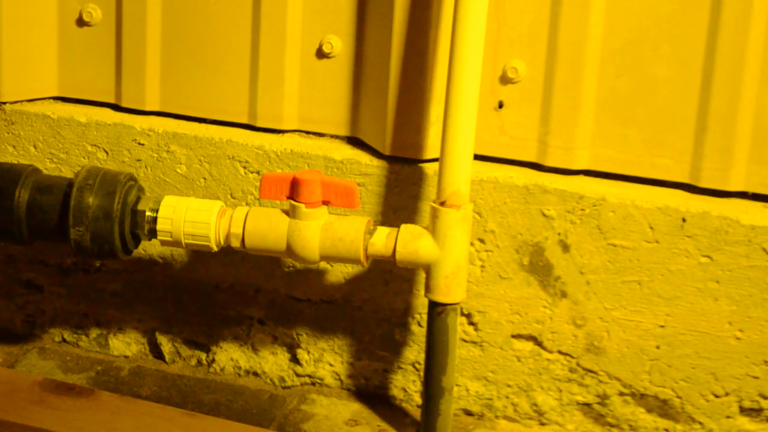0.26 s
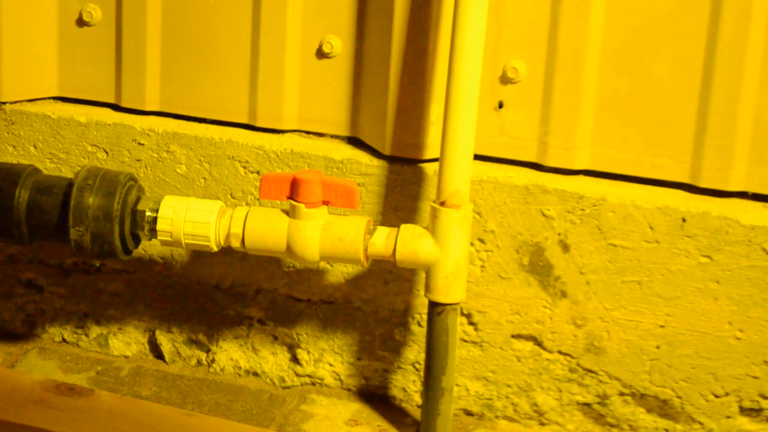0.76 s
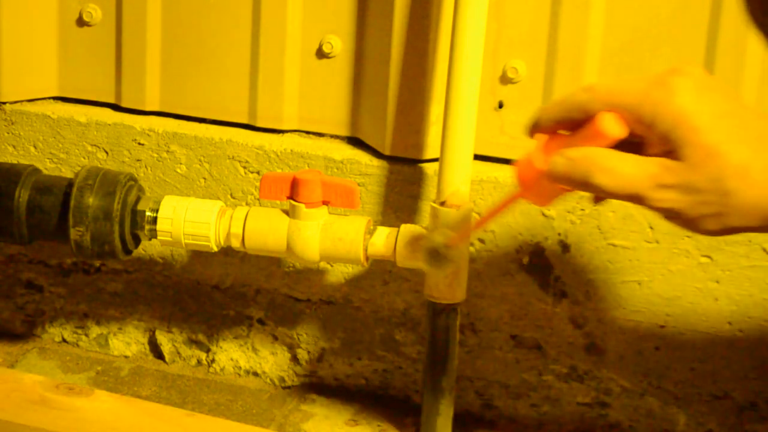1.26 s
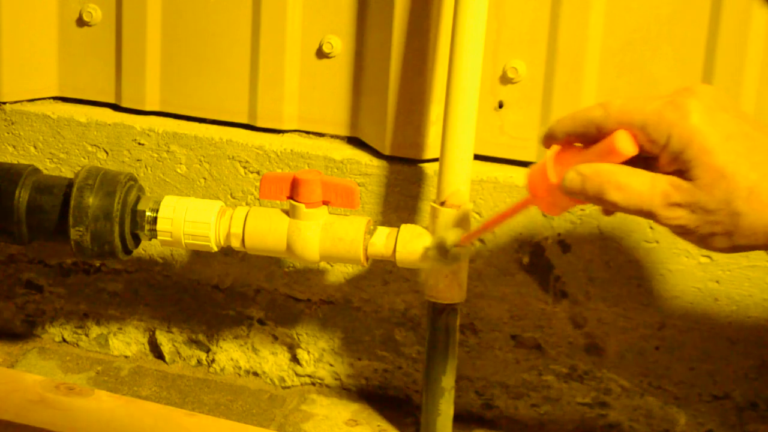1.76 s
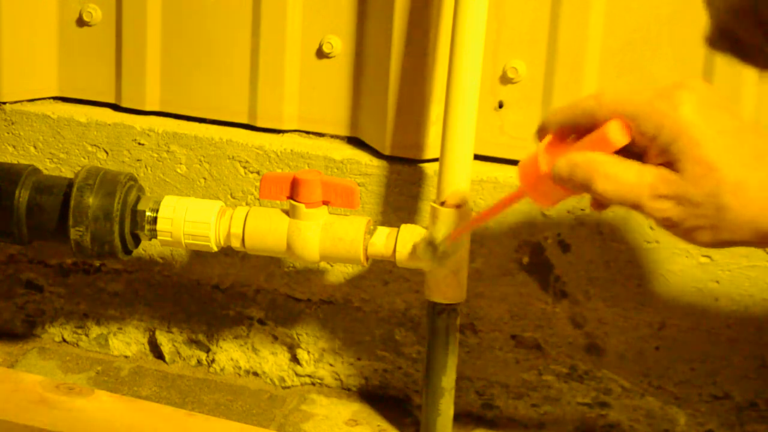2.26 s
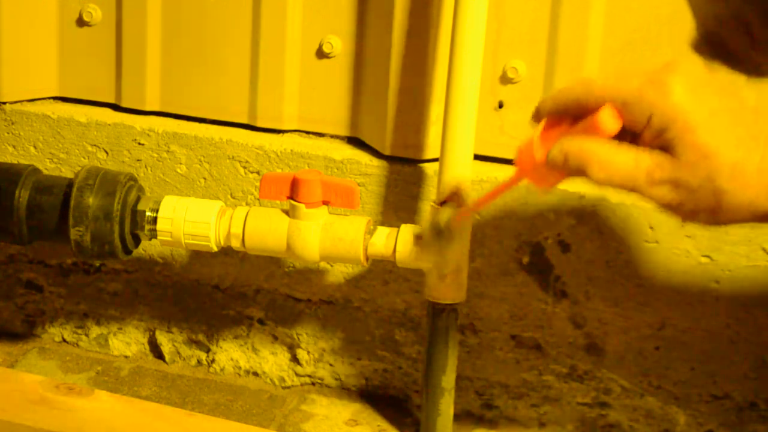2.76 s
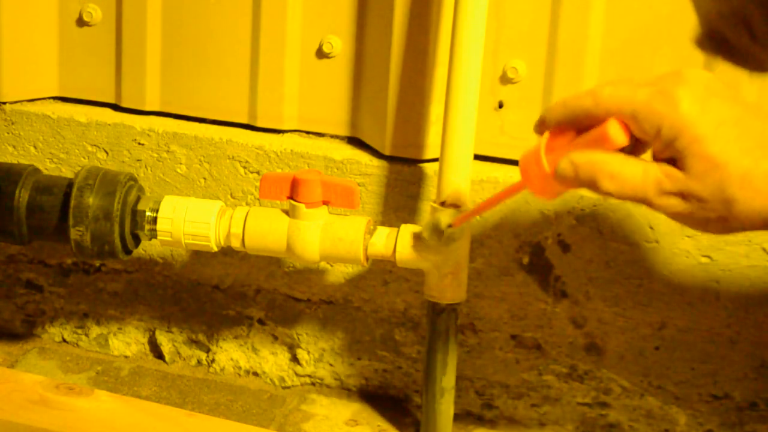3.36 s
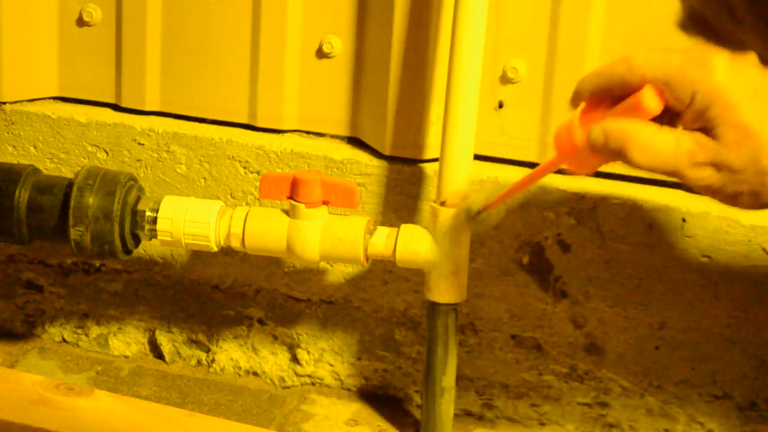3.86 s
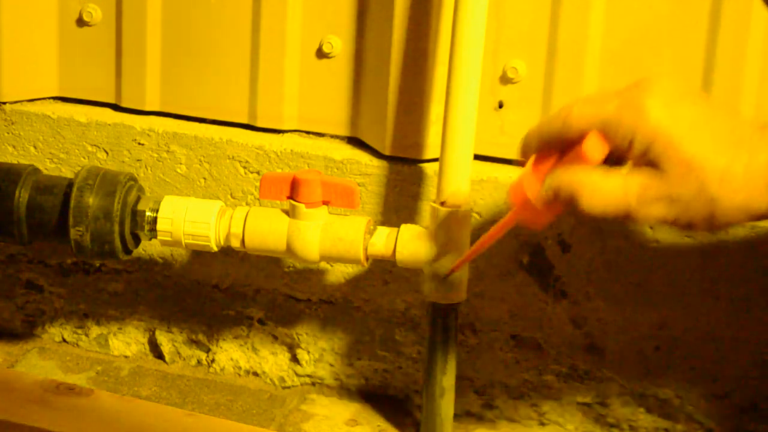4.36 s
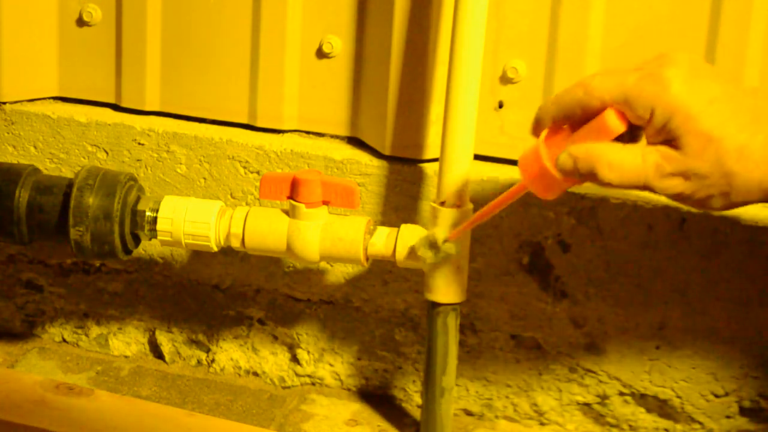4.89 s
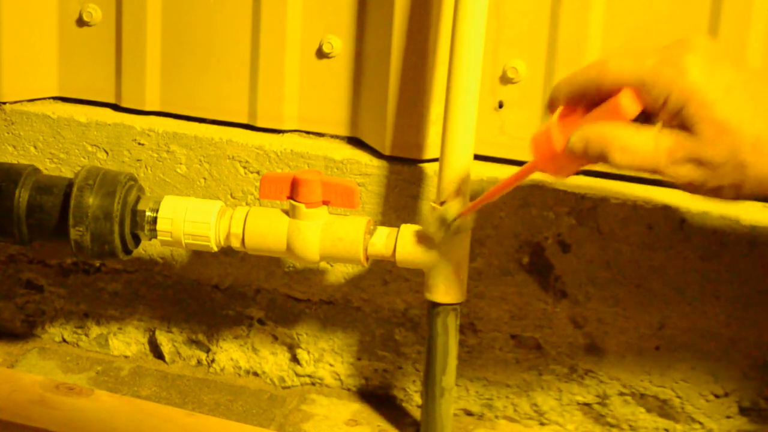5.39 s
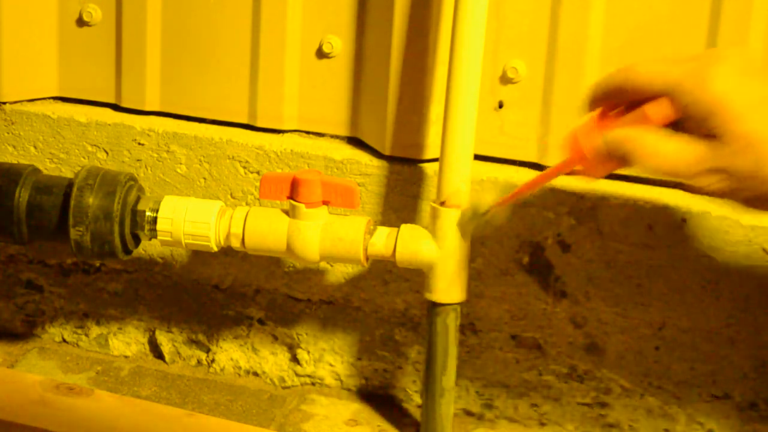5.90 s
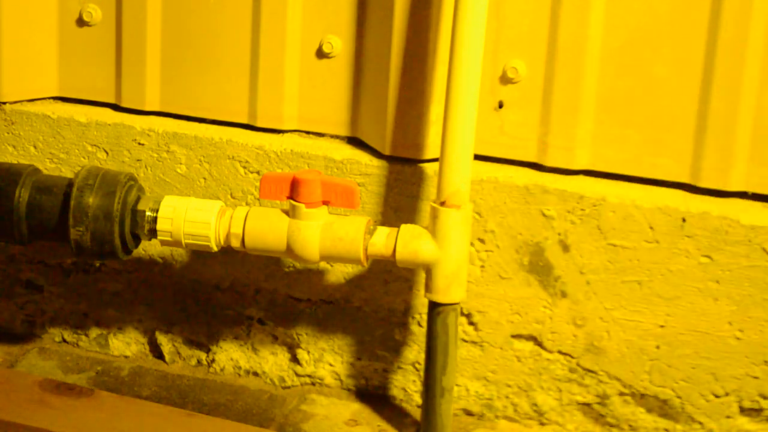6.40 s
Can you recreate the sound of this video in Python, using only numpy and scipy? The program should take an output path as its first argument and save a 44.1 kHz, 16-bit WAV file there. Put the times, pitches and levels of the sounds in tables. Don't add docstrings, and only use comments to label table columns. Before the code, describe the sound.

A suction motor drones steadily at mid pitch with rushing air, loud for half a second, then abruptly much quieter, with faint soft bumps.

```python
import sys
import numpy as np
from scipy import signal
from scipy.fft import rfft, irfft, next_fast_len
from scipy.io import wavfile
from scipy.ndimage import uniform_filter1d, map_coordinates

SR = 44100
rng = np.random.default_rng(int(sys.argv[2]) if len(sys.argv) > 2 else 0)


def natural_amplitude(level_db):
    exponent = np.asarray(level_db, float) / 20
    return 10 ** exponent


def master_out(mix):
    frames = np.transpose(np.atleast_2d(mix))
    ceiling = np.clip(frames, -1, 1)
    pcm = np.round(ceiling * 32767).astype(np.int16)
    wavfile.write(sys.argv[1], SR, pcm)


N = 292824
TIME = np.arange(N) / SR


def unit(x):
    return x / np.sqrt(np.mean(x ** 2) + 1e-20)


def wobble(rate, where=TIME):
    knots = rng.standard_normal(int(where[-1] * rate) + 4)
    return map_coordinates(knots, [where * rate])


def along(points, hz):
    point_hz, point_db = np.transpose(points)
    return np.interp(np.log(hz + 1), np.log(point_hz + 1), point_db)


def bell(hz, width):
    return lambda f: 1 / (1 + (2 * (f - hz) / width) ** 2)


def band_noise(colour_db):
    m = next_fast_len(N + 8192)
    spectrum = rfft(rng.standard_normal(m))
    return irfft(spectrum * natural_amplitude(colour_db(np.fft.rfftfreq(m, 1 / SR))), m)[:N]


def tone(turns, db, unsteady_db):
    level = np.sqrt(2) * natural_amplitude(db + unsteady_db * wobble(6))
    phase_drift = 0.16 * unsteady_db * wobble(5)
    return level * np.sin(2 * np.pi * turns + phase_drift + rng.uniform(0, 2 * np.pi))


def blades():
    # time in seconds, blade-pass rate in Hz.
    wheel = [
        (0, 405.15),
        (1.2, 405.42),
        (2.2, 405.45),
        (2.7, 405.65),
        (3.6, 404.95),
        (5.1, 405.97),
        (5.9, 405.4),
        (6.64, 405.55),
    ]
    # multiple of the blade pass, level in dB beside the blade tone, unsteadiness in dB.
    orders = [
        (2, -15, 1.2),
        (3, -32, 2),
        (4, -30, 2),
        (7, -34.5, 2),
    ]
    wheel_s, wheel_hz = np.transpose(wheel)
    turns = np.cumsum(np.interp(TIME, wheel_s, wheel_hz)) / SR
    overtones = sum(tone(k * turns, -43 + rel_db, shake) for k, rel_db, shake in orders)

    start_db, creep_db_per_s = -44, 0.26
    shift_s, shift_takes_s, shift_db, after_db_per_s = 4.4, 0.2, 1.7, -0.13
    shifted = np.clip((TIME - shift_s) / shift_takes_s, 0, 1)
    level_db = start_db + creep_db_per_s * np.minimum(TIME, shift_s)
    level_db += shifted * (shift_db + after_db_per_s * (TIME - shift_s))
    return tone(turns, level_db, 0.28) + overtones


def electric_hum():
    # frequency in Hz, level in dB, unsteadiness in dB.
    lines = [(120, -64.3, .5), (240, -77, 1), (451, -69, 2), (690.4, -71, 2), (1050.7, -65, 1.2),
             (1097, -72, 2), (1501.7, -72, 1.6), (4460, -90, 1.2), (4740, -96, 2), (8799, -104, 1.6),
             (8920, -104, 1.6), (9040, -109, 1.6), (13379, -115, 1.6), (15677.5, -106, .4)]
    return sum(tone(hz * TIME, db, shake) for hz, db, shake in lines)


def pipe_note():
    # frequency in Hz, width in Hz, level in dB.
    column = (295, 7, -61)
    hz, width, db = column
    resonance = bell(hz, width)
    note = signal.hilbert(unit(band_noise(lambda f: 20 * np.log10(resonance(f)))))
    evened = np.real(note / (np.abs(note) + 0.74) ** 0.5)
    return natural_amplitude(db) * unit(evened)


def air_rush():
    # frequency in Hz, density in dB per Hz.
    flow = [(20, -26), (60, -23.5), (110, -24.0), (200, 0.5), (400, -0.6), (700, -2.5), (1200, -10.0),
            (2000, -13), (3000, -21), (4500, -32), (6000, -39.5), (9000, -45.5), (13000, -51.5),
            (15600, -58.5)]
    # frequency in Hz, width in Hz, gain in dB.
    pipework = [(117, 50, 12.5), (174, 8, 0.8), (197, 38, -10.1), (265, 62, -15.3), (292, 22, 9.8),
                (346, 14, -6.0), (480, 26, -6.4), (532, 11, -3.5), (614, 15, 4.2), (673, 23, 4.9),
                (784, 93, -13.1), (797, 49, 14.6), (910, 82, 7.3), (926, 33, -9.8), (1104, 21, 4.7),
                (1136, 18, -4.7), (1181, 64, 7.1), (1319, 22, -3.9), (1356, 11, -4.0), (1406, 23, 5.8),
                (1689, 20, -10.9), (1703, 37, 8.0), (1836, 93, 6.2), (2042, 19, 5.8), (2094, 36, -7.4),
                (2280, 64, 9.4)]
    # frequency in Hz, width in Hz, gain in dB.
    shed = [(2321, 130, -12.5), (2378, 13, -5.1), (2400, 178, 8.1), (2460, 44, -7.2), (2606, 55, 7.7),
            (2607, 257, -7.7), (2812, 27, -5.4), (2924, 285, 4.5), (3189, 56, -4.6), (3429, 37, 6.7),
            (3739, 26, 6.2), (4187, 48, 5.9), (4258, 18, -5.9), (4544, 114, 5.8), (4722, 433, -3.0),
            (4739, 20, 6.8), (4836, 41, -11.5), (4839, 82, 10.4), (5002, 53, -5.7), (5181, 385, 8.4),
            (5235, 166, -10.1), (5811, 181, -5.6), (6090, 95, -5.0), (6732, 70, 7.3), (8804, 20, 8.6),
            (8873, 25, -3.3)]
    # frequency in Hz, width in Hz, gain in dB.
    panels = [(325, 20, 2), (345, 12, -3), (450, 14, 1.5), (565, 20, 4), (580, 14, -3), (670, 16, 1.5),
              (975, 20, 3), (1200, 10, -3), (1210, 14, 6), (1225, 12, -4), (1250, 14, -4), (1267, 20, 4),
              (1450, 20, 3), (1480, 14, -4), (1640, 12, -5), (1655, 14, 5), (1885, 14, -4), (2150, 25, 3),
              (3300, 20, -5), (3345, 20, 4), (3430, 40, -2), (3860, 50, -3), (3920, 40, 4), (4410, 30, -4),
              (9750, 70, 4), (10300, 90, 3), (12400, 120, 3), (14300, 200, 2), (14950, 500, 3),
              (15500, 400, -3)]

    def colour_db(f):
        resonances = sum(db * bell(hz, width)(f) for hz, width, db in pipework + shed + panels)
        ripple = 1.2 * wobble(1 / 22, f) * np.clip(f / 2000 - 0.5, 0, 1)
        return along(flow, f) + resonances + ripple

    _, _, z = signal.stft(band_noise(colour_db), SR, nperseg=1024)
    patches = uniform_filter1d(rng.standard_normal(z.shape), 5, axis=0)
    patches = uniform_filter1d(patches, 30, axis=1)
    rush = signal.istft(z * natural_amplitude(0.49 * unit(patches)), SR, nperseg=1024)[1][:N]
    return natural_amplitude(-48) * unit(rush)


def handling_rumble():
    # frequency in Hz, density in dB per Hz.
    low_end = [(12, -29), (25, -3), (50, 3.5), (85, -4.5), (120, -32.5)]
    start_db, growth_db_per_s, lumps_db = -94, 1.3, 2.5
    rumble = natural_amplitude(lumps_db * wobble(9)) * band_noise(lambda f: along(low_end, f))
    return natural_amplitude(start_db + growth_db_per_s * TIME) * unit(rumble)


def bumps():
    # start in seconds, peak in dB, swing in Hz.
    touches = [(0.002, -67, 50), (2.88, -69, 55), (3.05, -63, 45), (3.22, -71, 60), (3.55, -70, 55),
               (3.65, -70, 55), (3.72, -70, 55), (4.15, -64, 80), (4.93, -63, 65), (5.153, -63, 60),
               (5.205, -62, 65), (5.32, -68, 45), (5.482, -63, 85), (5.725, -55, 145), (5.75, -63, 45),
               (5.775, -64, 55), (5.99, -69, 50), (6.275, -59, 80), (6.335, -58, 70)]
    contact_s, swing_cycles = 0.012, 0.75
    out, t = np.zeros(N + SR), np.arange(SR // 5) / SR
    for start, db, hz in touches:
        u = 3 * t / (contact_s + swing_cycles / hz)
        push = u * np.exp(-u) * np.cos(2 * np.pi * hz * t)
        out[round(start * SR):][:len(t)] += natural_amplitude(db + 12.0) * push
    return out[:N]


def scene():
    motor = blades() + electric_hum()
    air = pipe_note() + air_rush()
    return (motor + air + handling_rumble() + bumps())[None]


def top_cut(x):
    return signal.sosfilt(signal.butter(12, 16020, fs=SR, output="sos"), x)


def record(dry):
    # start in seconds, end in seconds, gain before it in dB.
    gain_cut = (.5802, .5813, 25.6)
    start, end, high_db = gain_cut
    levelled = dry * np.interp(TIME, [start, end], [natural_amplitude(high_db), 1])
    top_hz = 15735
    m = next_fast_len(N + 8192)
    passed = np.fft.rfftfreq(m, 1 / SR) < top_hz
    mix = irfft(rfft(levelled, m) * passed, m)[:, :N]
    return top_cut(mix)


dry = scene()
out = record(dry)
master_out(out)
```